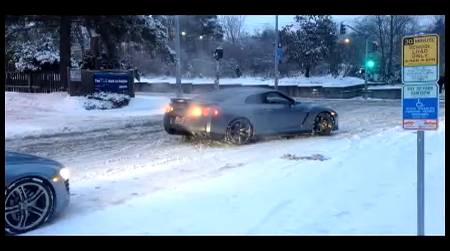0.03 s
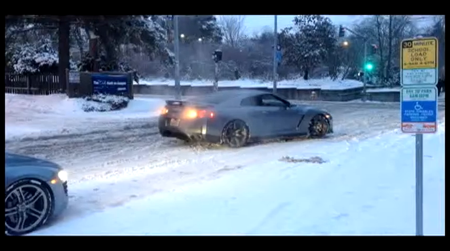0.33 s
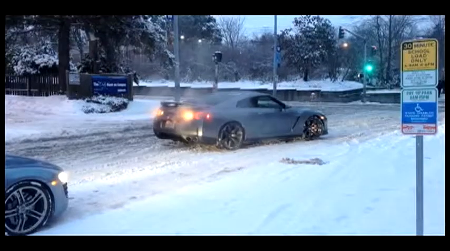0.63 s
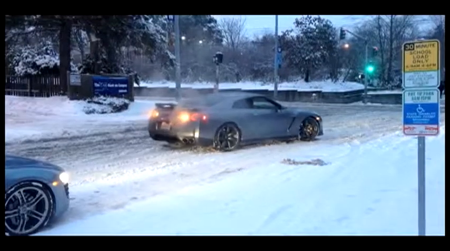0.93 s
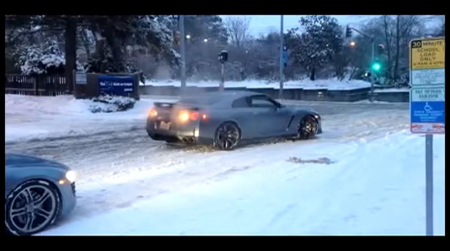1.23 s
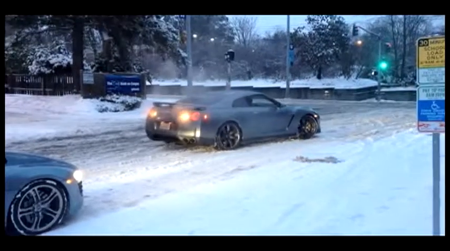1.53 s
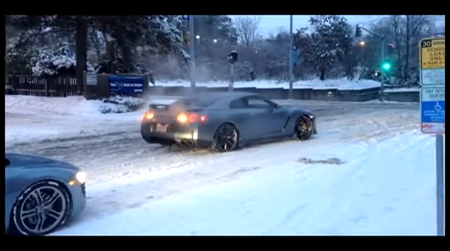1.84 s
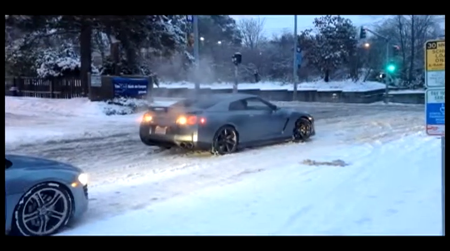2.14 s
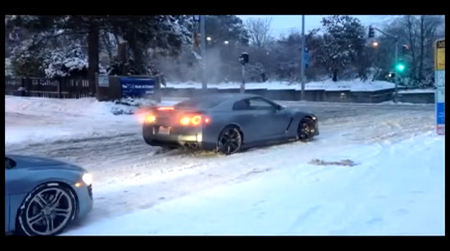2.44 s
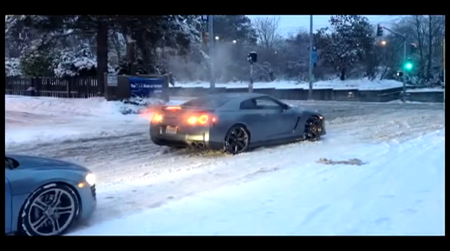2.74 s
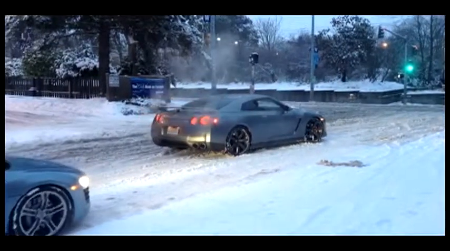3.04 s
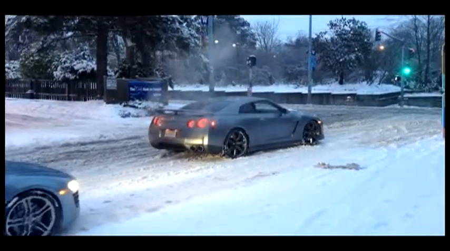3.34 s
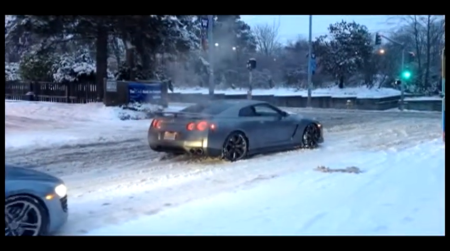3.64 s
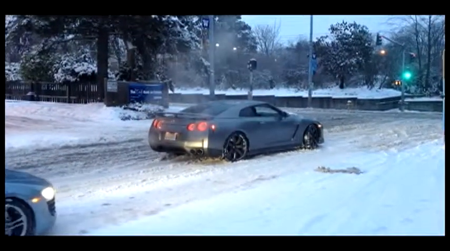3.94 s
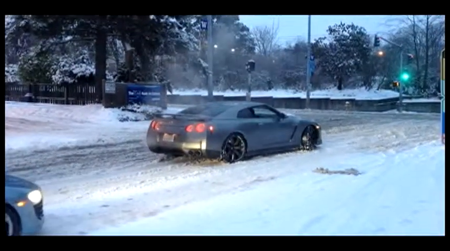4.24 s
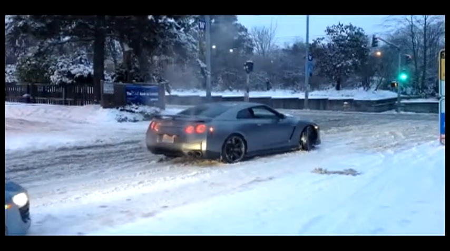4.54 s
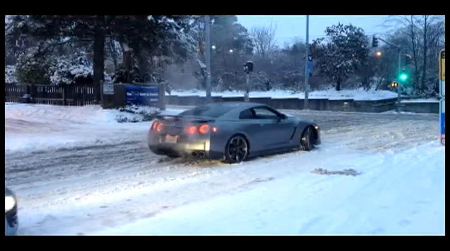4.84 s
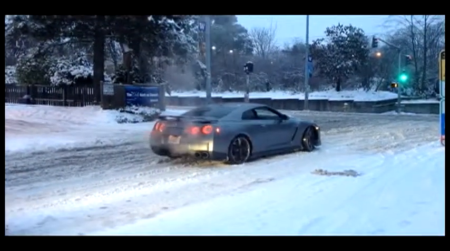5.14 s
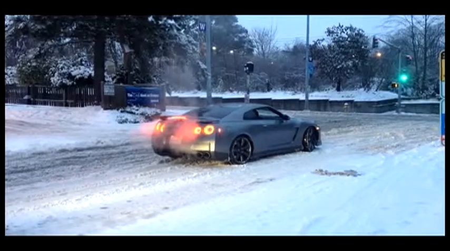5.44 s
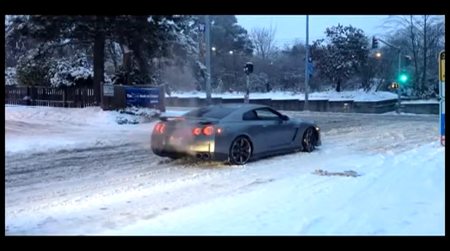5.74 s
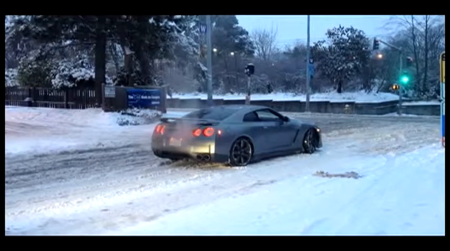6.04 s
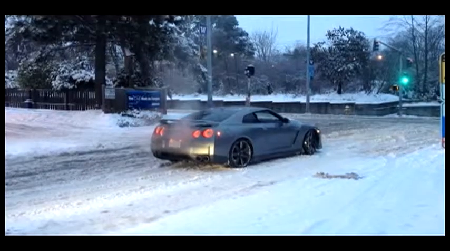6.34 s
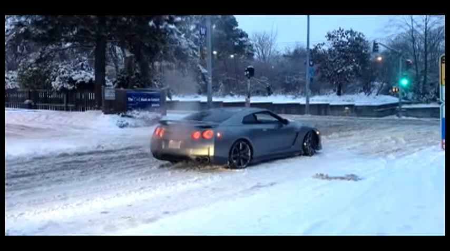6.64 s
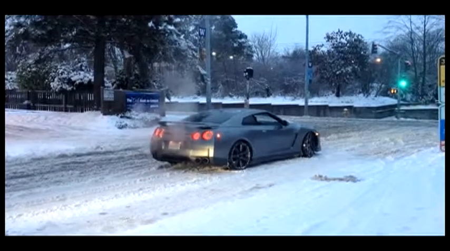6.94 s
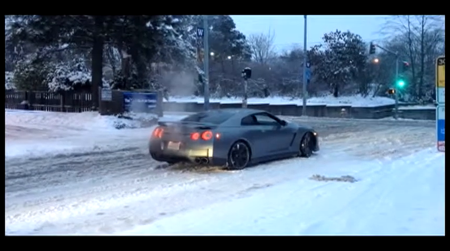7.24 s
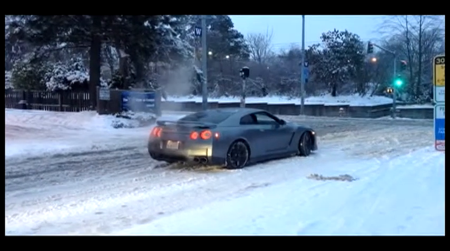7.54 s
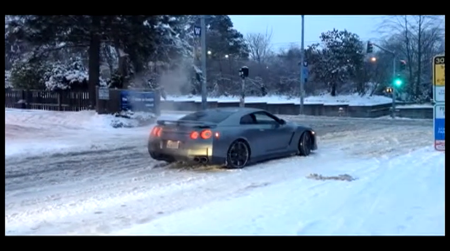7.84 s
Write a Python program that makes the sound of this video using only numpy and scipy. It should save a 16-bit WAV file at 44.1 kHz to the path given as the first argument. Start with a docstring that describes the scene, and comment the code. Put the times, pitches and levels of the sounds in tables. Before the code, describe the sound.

A sports car drones on snow, then revs twice with spinning wheels and spraying slush while another car idles nearby.

```python
"""A snowy street, far traffic hissing, a second car idling close to the microphone. A six-cylinder
sports car labours uphill at low revs, its exhaust droning and throbbing, its tyres squeaking faintly.
Snow crunches by the microphone, twice early on and in a cluster after 3 s. Just past 4 s the car is
revved: the wheels spin and spray slush, and the traction control cuts cylinders. The idling car backs
away, and after 7 s comes a second, higher rev with more wheelspin."""
import sys
import numpy as np
from scipy import signal
from scipy.fft import rfft, irfft, next_fast_len
from scipy.io import wavfile
from scipy.ndimage import map_coordinates

SR = 44100
rng = np.random.default_rng(int(sys.argv[2]) if len(sys.argv) > 2 else 0)


def master_out(mix):
    """Clip the mix to full scale and print it as 16-bit PCM to the path in sys.argv[1]."""
    frames = np.transpose(np.atleast_2d(mix))
    ceiling = np.clip(frames, -1, 1)
    pcm = np.round(ceiling * 32767).astype(np.int16)
    wavfile.write(sys.argv[1], SR, pcm)


N = 356769
T = np.arange(N) / SR
CRUISE_DB = -50  # load at which the sports car just creeps along


def amp(db):
    """Decibels to gain."""
    return 10 ** (np.asarray(db) / 20)


def unit(x):
    """Scales to rms 1."""
    return x / np.sqrt(np.mean(x ** 2) + 1e-20)


def lookup(x, table):
    """Reads a two-column table at x, along straight lines between its rows."""
    return np.interp(x, *np.transpose(table))


def colour(x, spectrum):
    """Filters by rows of (frequency [Hz], level [dB]); rms 1."""
    hz, db = np.transpose(spectrum)
    size = next_fast_len(N)
    bins_hz = np.fft.rfftfreq(size, 1 / SR)
    gain = amp(np.interp(np.log(bins_hz + 1), np.log(hz), db))
    return unit(irfft(rfft(x, size) * gain, size)[:N])


def wander(rate_hz):
    """Slow random motion of rms 1."""
    knots = rng.standard_normal(4000)
    return unit(map_coordinates(knots, [T * rate_hz * 2], order=2, mode="wrap"))


def resonate(x, hz, width_hz):
    """A resonance of gain 1."""
    return signal.lfilter(*signal.iirpeak(hz, hz / width_hz, SR), x)


def ring(x, modes):
    """Passes a sound through steep resonances; rms 1."""
    return unit(sum(amp(db) * resonate(resonate(x, hz, width), hz, width) for hz, width, db in modes))


def add(mix, s, sound):
    """Adds a sound at a time in seconds."""
    part = mix[round(s * SR):][:len(sound)]
    part += sound[:len(part)]


# Spectrum of the street: (frequency [Hz], relative level [dB])
STREET_SPECTRUM = [(20, -10), (40, -22), (62, 3), (100, 1), (160, 3.5), (300, 8), (600, 0), (900, -6.5),
                   (1600, -9.5), (3000, -13), (6000, -25.5), (11000, -39)]

def street(level_db=-54):
    """Traffic far from the microphone: steady rumble and hiss."""
    return amp(level_db) * colour(rng.standard_normal(N), STREET_SPECTRUM)


def firings(turns, cylinders_db, uneven_db, lope=1):
    """A click and a fading puff of gas per firing, by cylinder strength; turns counts the firings."""
    stroke = turns.astype(int)
    strength_db = lope * np.take(cylinders_db, stroke, mode="wrap")
    chance = np.take(rng.standard_normal(2000), stroke, mode="wrap")
    size = amp(strength_db + uneven_db * chance)
    return size * np.diff(stroke, prepend=0), size * np.exp(-2 * (turns % 1))


# Spectrum of the second car's burble: (frequency [Hz], relative level [dB])
IDLE_SPECTRUM = [(45, -44), (70, -15), (82, -15), (100, 7.5), (130, 10.5), (168, 17.5), (200, 12.5),
                 (235, 2.5), (285, 15.5), (320, 1.5), (480, -18), (640, 2.5), (850, -56)]

def idling_car(firing_hz=83.07, burble_db=-43.5, hum_db=-48.5, bass_db=-66, drift=.004):
    """Close by, eight uneven cylinders burble and hum, a little fainter as the car backs away."""
    turns = np.cumsum(firing_hz * (1 + drift * wander(1.8))) / SR
    clicks, puffs = firings(turns, [-4, -24, -3, -2.5, -43, -3, -7.5, -5], uneven_db=1)
    bank = np.take([1, -1, -1, 1, -1, 1, 1, -1], turns.astype(int), mode="wrap")
    gas = unit(puffs * rng.standard_normal(N))
    burble = colour(unit(clicks * bank) + 1.3 * gas, IDLE_SPECTRUM)
    hum = unit(np.sin(4 * np.pi * turns) * amp(2.7 * wander(21)))
    bass = unit(np.sin(2 * np.pi * turns))
    backing_away = amp(np.interp(T, [4.8, 7.1], [0, -4]))
    return backing_away * (amp(burble_db) * burble + amp(hum_db) * hum + amp(bass_db) * bass)


def slush(grains_per_s, wash_db):
    """Countless grains of wet snow, a few of them large, in an even wash."""
    sizes = amp(3 * np.minimum(rng.exponential(1, N), 4))
    grains = (rng.random(N) < grains_per_s / SR) * rng.choice([-1, 1], N) * sizes
    return unit(grains) + amp(wash_db) * rng.standard_normal(N)


# Snow giving way:
# (time [s], relative level [dB], centre [Hz], time to fall 60 dB [s], body against burst [dB])
SNOW_CRUNCHES = [(0.566, -49, 3090, 0.035, -15.5), (1.045, -48.5, 4350, 0.074, -10),
                 (3.217, -57, 8000, 0.097, -7), (3.654, -52, 4660, 0.11, 3), (3.683, -48.5, 4670, 0.12, 1),
                 (3.686, -57, 8300, .05, -12), (3.824, -50, 7900, 0.08, -1), (3.855, -50.5, 7260, 0.22, 0),
                 (3.895, -61, 8000, 0.22, 9), (4.272, -58, 2197, .11, -4), (4.306, -45, 4470, .08, 3)]

def crunches(level_db=-4, relative_width=0.29, rise_s=0.00059, body_hz=2000, body_width_hz=1700):
    """Near the microphone, snow grains break in short bursts over the duller squash of the pack."""
    out, t = np.zeros(N), T[:SR // 3]
    grains = unit(slush(grains_per_s=2800, wash_db=29))
    for s, db, hz, decay_s, body_db in SNOW_CRUNCHES:
        breaking = grains[int(s * SR):][:len(t)]
        width_hz = relative_width * hz
        burst = unit(resonate(resonate(breaking, hz, width_hz), hz, 2 * width_hz))
        body = amp(body_db) * ring(breaking, [(body_hz, body_width_hz, 0)])
        envelope = amp(db + level_db - 60 * t / decay_s) * (1 - np.exp(-t / rise_s))
        add(out, s, (burst + body) * envelope)
    return out


# Tyre squeaks: (time [s], length [s], start pitch [Hz], end pitch [Hz], relative level [dB])
TYRE_SQUEAKS = [(0.165, 0.073, 986, 1190, -55), (2.551, 0.11, 1325, 1483, -64),
                (2.869, 0.082, 1520, 1380, -67), (2.992, 0.068, 1383, 1500, -67),
                (3.97, 0.16, 1340, 1220, -62.5), (5.872, 0.079, 1690, 1615, -62),
                (5.894, 0.048, 1490, 1260, -62), (6.027, .12, 1606, 1490, -61),
                (7.155, 0.077, 1670, 1766, -54), (7.18, 0.065, 1498, 1500, -57),
                (7.305, 0.061, 1470, 1430, -55), (7.376, 0.1, 1490, 1633, -54.5),
                (7.408, 0.13, 1072, 1127, -55.5), (7.439, 0.047, 1860, 1840, -56),
                (7.547, 0.097, 1765, 1555, -54), (7.548, 0.078, 1980, 1860, -58),
                (7.819, .08, 1532, 1580, -65)]

def squeaks(waver=0.011, level_db=-1):
    """Out on the road, rubber slips on packed snow in faint, unsteady glides."""
    out, shake = np.zeros(N), 1 + waver * wander(70)
    for s, length_s, start_hz, end_hz, db in TYRE_SQUEAKS:
        n = int(length_s * SR)
        hz = np.linspace(start_hz, end_hz, n) * shake[int(s * SR):][:n]
        glide = np.sin(2 * np.pi * np.cumsum(hz) / SR)
        add(out, s, amp(db + level_db) * unit(glide * signal.windows.tukey(n, .7)))
    return out


# Losses of grip: (start [s], rise [s], hold [s], fade [dB/s], grip returns [s], slip [dB])
WHEELSPINS = [(4.208, .067, 0.33, 16.5, 4.87, 0.6), (4.893, 0.2, 0.19, 3, 5.29, -1.5),
              (7.043, 0.21, .29, 9, 8.2, 1)]

def wheelspin(catch_s=.12):
    """Slip of the wheels as a gain: they break loose, spin, slow down and catch again."""
    slip = 0
    for s, rise_s, hold_s, fade, grip_s, db in WHEELSPINS:
        loose = np.clip(np.minimum((T - s) / rise_s, 1 - (T - grip_s) / catch_s), 0, 1)
        slip += loose * amp(db - fade * np.maximum(T - s - rise_s - hold_s, 0))
    return slip


def effort(load_db, slip, rolling_db, spinning_db, load_rise):
    """Level in dB of a sound that grows a little with load and leaps when the wheels slip."""
    rolling = amp(rolling_db + load_rise * (load_db - CRUISE_DB))
    return 10 * np.log10(rolling ** 2 + (amp(spinning_db) * slip) ** 2)


# Spectra of snow ground under the treads and of snow flung off: (frequency [Hz], relative level [dB])
CHURN_SPECTRUM = [(100, -13), (350, 13.5), (700, 7.5), (880, 2.5), (1150, 5.5), (1750, 3), (2300, -1),
                  (3000, -9.5), (4300, -23), (6000, -27), (11000, -39)]
SPRAY_SPECTRUM = [(1500, -35), (3000, 0.5), (4100, 5), (5100, -1), (6800, -0.5), (8400, -0.5),
                  (10000, -5.5), (11500, -15)]

def tyres(load_db, slip):
    """At road level, the treads grind the snow and fling it against the road and wheel arches."""
    churn_db = effort(load_db, slip, rolling_db=-52, spinning_db=-49, load_rise=0.12)
    spray_db = effort(load_db, np.sqrt(slip), rolling_db=-64.5, spinning_db=-60.5, load_rise=0.12)
    lumps = amp(0.96 * wander(18))
    churn = colour(slush(grains_per_s=1400, wash_db=4), CHURN_SPECTRUM)
    spray = colour(slush(grains_per_s=1500, wash_db=5.5), SPRAY_SPECTRUM)
    return lumps * (amp(churn_db) * churn + amp(spray_db) * spray)


# Resonances of the engine block: (frequency [Hz], width [Hz], relative level [dB])
BLOCK_MODES = [(4660, 400, -3), (5140, 1500, -9), (8300, 1300, -17.5)]

def knock(turns, firing_hz, load_db, slip, level_db=2, rise=1.6, sustain=.4):
    """Under the bonnet, each firing pings the block; under load the pings merge in a grainy rattle."""
    shudder = amp(5 * np.exp(-((firing_hz - 64) / 3.1) ** 2))  # shakes hardest at 64 firings a second
    force_db = effort(load_db, slip ** 2 * shudder, rolling_db=-69, spinning_db=-64, load_rise=0.41)
    _, puffs = firings(turns, [0], uneven_db=1.1)
    pings = ring((sustain + puffs ** 2) * rng.standard_normal(N), BLOCK_MODES)
    return amp(force_db.max() + level_db + rise * (force_db - force_db.max())) * pings


# Cylinder cuts at the top of each rev: (start [s], length [s], depth [ratio])
TRACTION_CUTS = [(4.631, 0.14, 0.9), (4.744, 0.24, 0.6), (7.51, 0.137, 1.2), (7.605, 0.13, 0.66)]

def traction_control(ramp_s=0.011):
    """How deeply the traction control is cutting cylinders."""
    return sum(depth * np.clip(np.minimum(T - s, s + length_s - T) / ramp_s, 0, 1)
               for s, length_s, depth in TRACTION_CUTS)


# The six cylinders in firing order: (relative strength [dB])
CYLINDERS_DB = [-6, -3, 2, 5, -1, -7]
# Their inequality, greatest near 68 firings a second: (firing rate [Hz], depth [ratio])
LOPE_DEPTH = [(51, .9), (57, 1.05), (62, 1.1), (68, 1.35), (80, .5)]
# Resonances of the silencer: (frequency [Hz], width [Hz], relative level [dB])
SILENCER_MODES = [(48.6, 76, -34), (107, 61, -16), (131.6, 46, -13.5), (187.6, 44, -4), (228, 29, -2.5),
                  (278, 33, -8)]

def rasp(turns, firing_hz, load_db, cut, level_db=-8, gas_db=-1, load_rise=0.71, cut_db=8):
    """Under the car, unequal firings and their puffs make the silencer rumble, more so during cuts."""
    lope = lookup(firing_hz, LOPE_DEPTH)
    clicks, puffs = firings(turns, CYLINDERS_DB, uneven_db=1.5 - lope, lope=lope)
    gas = amp(gas_db) / np.sqrt(lope) * unit(puffs * rng.standard_normal(N))
    # the share common to all firings is the drone; only their inequality rumbles
    steady = np.diff(turns.astype(int), prepend=0)
    inequality = unit(clicks - steady * clicks.sum() / steady.sum())
    rumble_db = load_db.max() + level_db + load_rise * (load_db - load_db.max())
    return amp(rumble_db + cut_db * cut) * ring(inequality + gas, SILENCER_MODES)


# Each cylinder's path through the manifold: (delay [ms])
RUNNER_DELAYS_MS = [0.077, 1.28, 0.39, 0.825, 1.97, 0.44]

def manifold(clicks, turns):
    """Each cylinder's pulse reaches the tailpipe after its own delay."""
    at, out = np.flatnonzero(clicks), np.zeros(N)
    delay_s = np.take(RUNNER_DELAYS_MS, turns[at].astype(int), mode="wrap") / 1000
    out[np.minimum(at + (delay_s * SR).astype(int), N - 1)] = clicks[at]
    return out


# Tailpipe resonances, changing at the microphone as the car slews:
# (frequency [Hz], width [Hz], first relative level [dB], last relative level [dB])
TAILPIPE_MODES = [(373, 21, -9, -1.5), (463.7, 48, -3, 3.5), (498, 32.4, 5, 1.5), (553.7, 63, 0.5, -11),
                  (634.7, 44, -7.5, -5), (691, 45, -12.5, -10.5), (749, 87, -15.5, -26)]
# Loudness of the chug: (time [s], level [dB])
CHUG_LEVEL = [(.07, -49), (.42, -50.5), (.6, -54), (1.05, -55), (1.5, -55), (2.2, -59), (3.2, -56),
              (4.2, -56), (4.45, -41.5), (4.65, -37.5), (5.0, -45), (5.3, -49.5), (6.0, -47.5),
              (7.05, -51.5), (7.4, -37), (7.6, -38.5), (7.85, -42.5), (8.09, -51)]

def chug(turns, firing_hz, slip, depth=1.1, evening=.6, gas_db=-12, bright_db_per_octave=9):
    """The strongest cylinder rings the tailpipe once a cycle; in wheelspin it evens into a roar."""
    lope = depth * lookup(firing_hz, LOPE_DEPTH) * (1 - evening * np.minimum(slip, 1))
    clicks, puffs = firings(turns, CYLINDERS_DB, uneven_db=.6, lope=lope)
    rms_size = np.sqrt(np.mean(amp(np.outer(CYLINDERS_DB, lope)) ** 2, axis=0))
    pulses = unit(manifold(clicks / rms_size, turns))
    gas = unit(puffs / rms_size * rng.standard_normal(N))
    gas_gain = amp(gas_db) + slip
    drive = (pulses + gas_gain * gas) / np.hypot(1, gas_gain)
    tilt = bright_db_per_octave * slip
    modes = [(hz, width, np.linspace(first_db, last_db, N) + tilt * np.log2(hz / 500))
             for hz, width, first_db, last_db in TAILPIPE_MODES]
    return amp(lookup(T, CHUG_LEVEL)) * ring(drive, modes)


# How the exhaust carries a tone, booming near 260 Hz: (frequency [Hz], gain [dB])
EXHAUST_BOOM = [(60.0, -13), (75.0, -21), (87.0, -12), (95.0, -5), (104.0, -16.5), (114.0, -1.4),
                (128.0, -10), (138.0, -10.5), (150.0, -3.5), (165.0, -15.5), (178.0, -7.5), (192.0, -12.5),
                (203.0, -0.5), (213.0, -10), (228.0, -1.5), (238.0, -4.5), (249.0, 2.5), (262.0, 0.75),
                (274.0, 2.6), (286.0, -8), (300.0, -19), (450.0, -14)]

def growl(turns, firing_hz, load_db, cut, level_db=-32, uncut_db=-17, load_rise=0.99, cut_rise=0.63):
    """Unequal firings put unsteady tones between the exhaust's harmonics, loudest during cuts."""
    over_db = load_db - load_db.max()
    size = cut * amp(cut_rise * over_db) + amp(uncut_db + load_rise * over_db)
    out = 0
    for k in range(9, 23):
        if k % len(CYLINDERS_DB):
            order = k / len(CYLINDERS_DB)
            own_db = 0 if order % 1 == .5 else -12  # strongest halfway between harmonics
            db = own_db + lookup(order * firing_hz, EXHAUST_BOOM) + 3 * wander(14)
            out += amp(db) * np.sin(2 * np.pi * (order * turns + rng.random()))
    return amp(level_db) * size * out


# Harmonics at 1 to 5 times the firing rate: (relative level [dB], rise with load [dB/dB])
DRONE_HARMONICS = [(-14.5, 1.5), (-4.3, 1.44), (-3.5, 1.1459), (-2.5, 0.6656), (-5, 0.55)]

def drone(turns, firing_hz, load_db, cut, level_db=-35.2, cut_db=-4.5, faint_db=-56.2):
    """The exhaust's low harmonics grow with load, swell through the boom and give way during cuts."""
    flutter_db = np.interp(firing_hz, [52, 60, 68, 85], [2, .8, .6, 1.2])
    out = 0
    for k, (own_db, rise) in enumerate(DRONE_HARMONICS, 1):
        db = level_db + own_db + rise * (load_db - CRUISE_DB) + lookup(k * firing_hz, EXHAUST_BOOM)
        sinking = 1 / np.sqrt(1 + amp(2 * (faint_db - db)))  # faint harmonics sink into the rumble
        gain = sinking * amp(db + cut_db * cut + flutter_db * wander(16))
        out += gain * np.sin(2 * np.pi * (k * turns + rng.random()))
    return out


# Engine speed: (time [s], firing rate [Hz])
ENGINE_SPEED = [(0.07, 67.38), (0.47, 67.95), (0.72, 65.35), (0.92, 64.93), (1.15, 66.0), (1.48, 62.47),
                (1.7, 57.85), (2.25, 51.43), (2.7, 49.84), (3.0, 47.86), (3.32, 47.42), (3.7, 52.87),
                (4.26, 57.67), (4.37, 57.45), (4.46, 64.04), (4.54, 75.65), (4.59, 83.71), (4.65, 89.15),
                (4.72, 87.1), (4.8, 81.54), (4.9, 71.08), (5.0, 64.43), (5.18, 60.33), (5.35, 54.91),
                (5.6, 60.58), (5.92, 63.04), (6.33, 60.62), (6.7, 59.55), (7.14, 56.55), (7.32, 63.31),
                (7.41, 75.79), (7.5, 92.26), (7.56, 100.22), (7.63, 92.72), (7.69, 87.8), (7.81, 93.5),
                (7.9, 83.53), (8.09, 70.59)]
# Load from the throttle: (time [s], load [dB])
THROTTLE_LOAD = [(.07, -48.5), (.45, -45), (.7, -47), (.95, -43), (1.15, -53), (1.46, -52), (1.52, -57.5),
                 (2.1, -59.5), (2.75, -52.5), (3, -55.5), (3.22, -53), (3.42, -63), (4.2, -56),
                 (4.35, -45.5), (4.58, -38.5), (4.8, -42), (5.02, -41.5), (5.17, -46), (5.3, -52),
                 (5.6, -51), (5.75, -47.5), (6.15, -48.5), (6.35, -54), (7.1, -48.5), (7.3, -40),
                 (7.47, -39.5), (7.62, -40.5), (7.85, -40.5), (7.98, -49.5), (8.09, -44)]

def sports_car():
    """The car climbing the street: engine speed, load and wheel slip drive exhaust, block and tyres."""
    firing_hz, load_db = lookup(T, ENGINE_SPEED), lookup(T, THROTTLE_LOAD)
    slip, cut = wheelspin(), traction_control()
    turns = np.cumsum(firing_hz) / SR
    tones = drone(turns, firing_hz, load_db, cut) + growl(turns, firing_hz, load_db, cut)
    throb = rasp(turns, firing_hz, load_db, cut) + chug(turns, firing_hz, slip)
    return tones + throb + knock(turns, firing_hz, load_db, slip) + tyres(load_db, slip) + squeaks()


def scene():
    """From one spot on the street: the sports car, snow and idling car close by, traffic far off."""
    return (sports_car() + crunches() + idling_car() + street())[None]


def record(dry, opens_s=.072, edge_hz=11300):
    """One microphone, opening after a moment, with a steep limit on the treble."""
    low_pass = signal.firwin(255, edge_hz, window=("kaiser", 8), fs=SR)
    return signal.oaconvolve(dry * (T > opens_s), low_pass[None], "same")


dry = scene()
out = record(dry)
master_out(out)
```